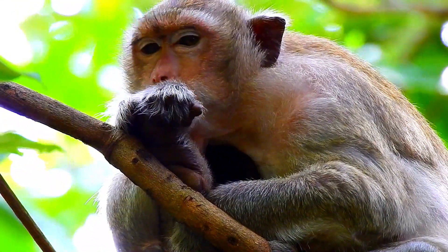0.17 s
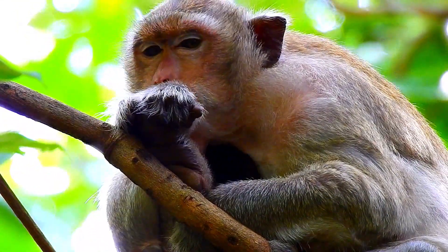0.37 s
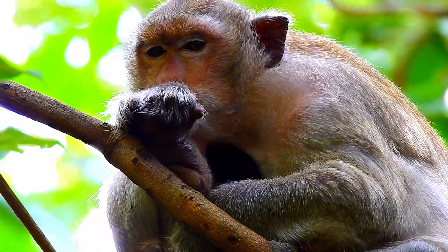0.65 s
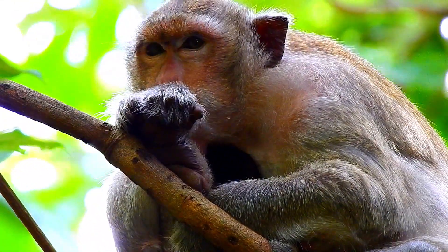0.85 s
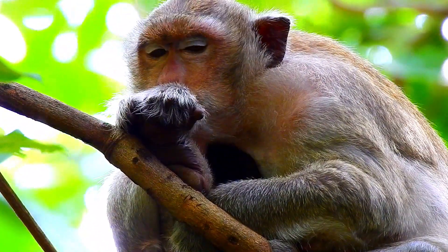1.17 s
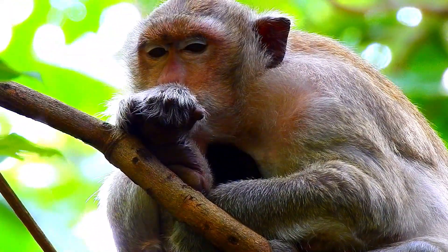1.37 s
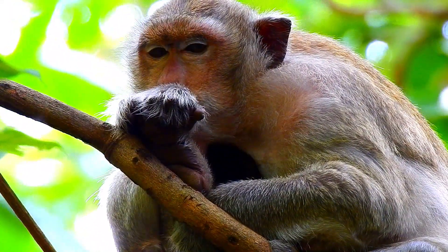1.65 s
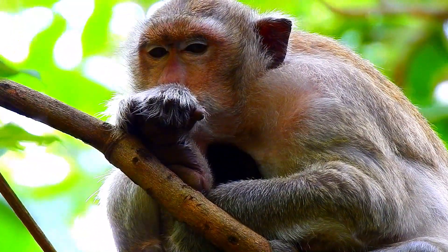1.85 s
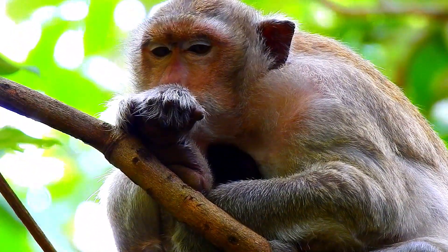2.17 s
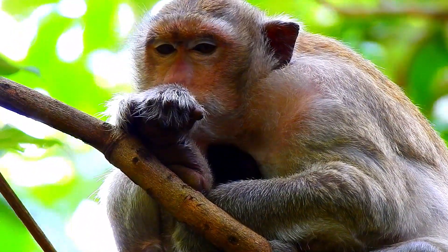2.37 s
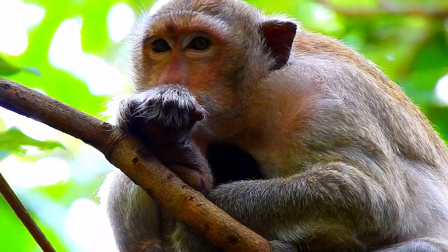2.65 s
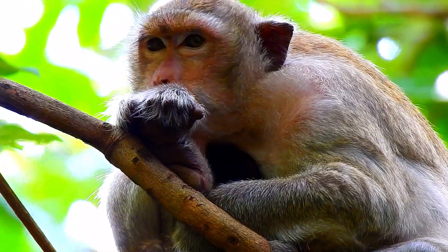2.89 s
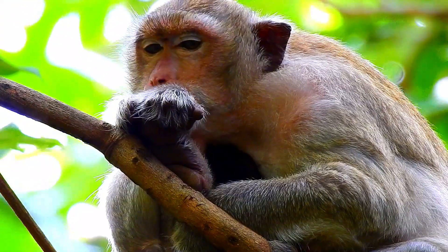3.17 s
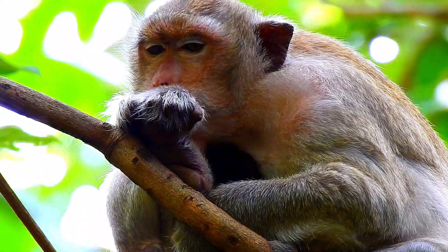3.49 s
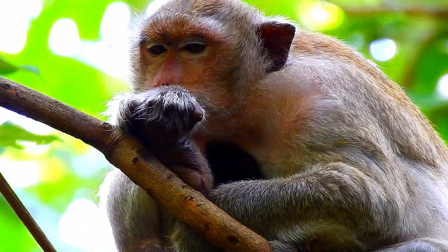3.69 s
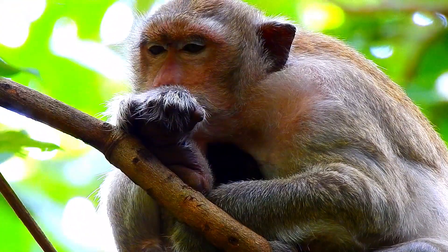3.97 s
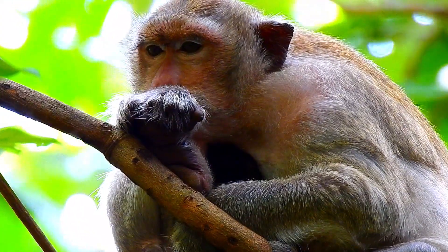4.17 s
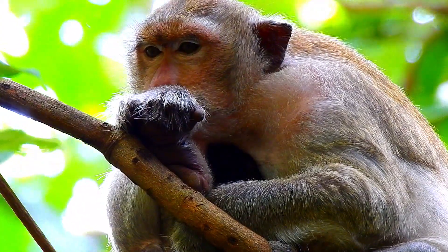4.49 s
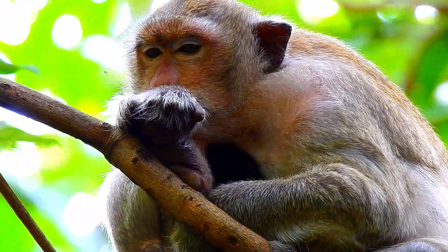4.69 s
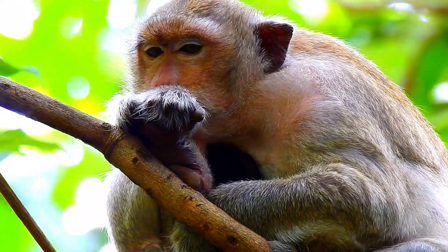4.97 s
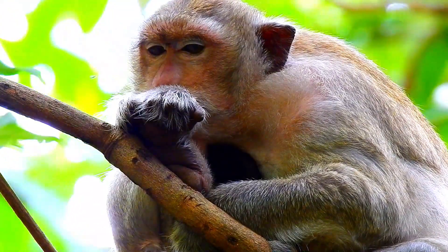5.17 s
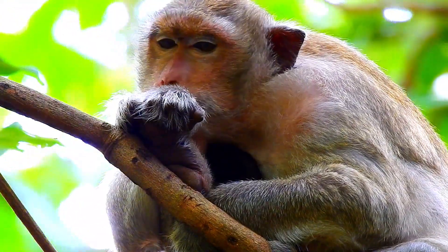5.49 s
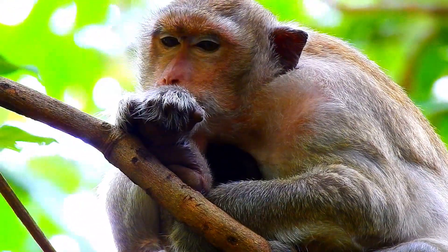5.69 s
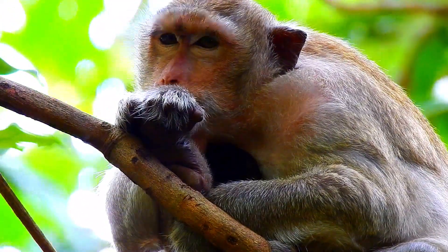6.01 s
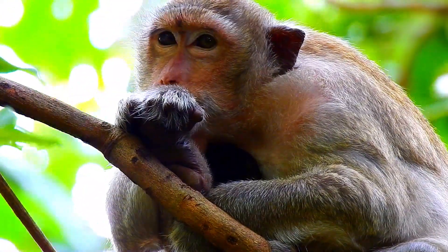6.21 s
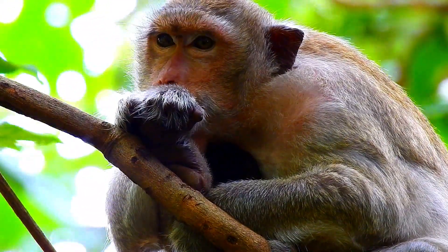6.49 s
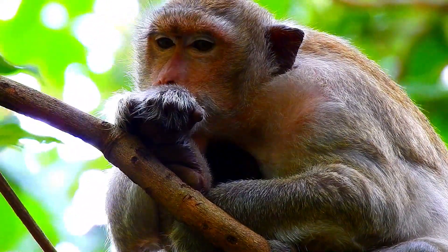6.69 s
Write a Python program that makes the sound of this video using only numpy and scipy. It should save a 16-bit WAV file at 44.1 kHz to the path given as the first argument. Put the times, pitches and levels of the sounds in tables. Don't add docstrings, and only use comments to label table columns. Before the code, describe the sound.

A dense cicada chorus drones at a high, narrow, metallic pitch around 4.5 kHz from the start, slightly fluttering, while one near cicada adds loud single ticks roughly every quarter second. Beneath are low gusty wind rumble with faint moans, a blurred hush of distant calls, hissing leaves and a faint even cricket trill. Quick rasps come at 1.0 and 1.25 seconds, then twig knocks and crackles around 1.3 to 1.5, with faint bird whistles. Near 2.1 a throbbing, split-voiced animal squeal rises and fades amid stronger knocks. Sound cuts dead from 2.5 to 3.0, then returns about 3 dB louder. Brighter bird notes and knocks follow; ticks become less regular. A louder squeal comes at 4.4, buzzing rasps at 4.75 and 5.0, a sharp leaf crackle and clear whistle near 5.4. Crackling continues around 6.1 to 6.5, with light knocks, and the chorus runs to the end at about 7.

```python
import sys
import numpy as np
from scipy import signal
from scipy.fft import rfft, irfft
from scipy.io import wavfile
from scipy.ndimage import uniform_filter1d

SR = 44100
rng = np.random.default_rng(int(sys.argv[2]) if len(sys.argv) > 2 else 0)


def natural_amplitude(level_db):
    exponent = np.asarray(level_db, float) / 20
    return 10 ** exponent


def unload_audio(sound):
    columns = np.transpose(np.atleast_2d(sound))
    steps = np.round(np.clip(columns, -1, 1) * 32767)
    wavfile.write(sys.argv[1], SR, steps.astype(np.int16))


N = 302085

DROPOUT = (2.49408, 2.99457)


def evened(x):
    return x / np.sqrt(np.mean(x ** 2) + 1e-20)


def read(points, hz):
    f, value = np.transpose(points)
    return np.interp(np.log(hz + 1), np.log(f + 1), value)


def add(mix, s, sound, pan_db=0):
    part = mix[:, round(s * SR):][:, :len(sound)]
    sides = natural_amplitude(np.array([[.5], [-.5]]) * pan_db)
    part += sound[:part.shape[1]] * sides


def drift(count, smooth_s):
    size = max(int(smooth_s * SR), 1)
    smooth = uniform_filter1d(rng.standard_normal(count), size)
    return evened(uniform_filter1d(smooth, size))


def resonate(x, hz, width):
    turn = np.exp(2j * np.pi * np.cumsum(hz * np.ones(x.shape[-1])) / SR)
    r = np.exp(-np.pi * width / SR)
    smooth = signal.lfilter([(1 - r) ** 2], [1, -2 * r, r * r], x / turn + 1e-18)
    return 2 * (turn * smooth).real


def ports(a, b):
    # frequency in Hz, left-right likeness (0 to 1).
    likeness = [(50, 0.89), (130, 0.93), (290, 0.56), (640, 0.69), (2000, 1), (4500, 0.65), (7000, 0.094),
                (15000, 0.37)]
    # frequency in Hz, phase by which the left leads in radians.
    left_lead = [(100, 0), (3400, 1.04), (4900, 0.52), (6700, 1.16), (9500, 4), (13000, 2), (15500, 7.5)]
    hz = np.fft.rfftfreq(N, 1 / SR)
    same = np.clip(read(likeness, hz), -1, 1)
    right = same * rfft(a) + np.sqrt(1 - same ** 2) * rfft(b)
    right = right * np.exp(-1j * read(left_lead, hz))
    return np.array([a, irfft(right, N)])


def lift_db():
    return 3 * (np.arange(N) > DROPOUT[0] * SR)


def wind_db():
    # time in seconds, wind strength in dB.
    gusts = [(0, 2), (.3, -2), (1.5, -2), (2.4, 0.5), (3.0, 3), (3.3, -3), (3.6, 1), (4.1, -2), (5.2, -1.5),
             (6.5, 0.5), (6.7, 1), (6.85, -3)]
    return np.interp(np.arange(N) / SR, *np.transpose(gusts))


def swell_db(t, rise_s, rise_db, fall_db_per_s):
    return np.where(t < rise_s, rise_db * (1 - t / rise_s), fall_db_per_s * (rise_s - t))


def wash(colour, patchy_db, bins, frames_long):
    frames, hz = N // 256 + 5, np.fft.rfftfreq(1024, 1 / SR)
    a, b, c, d, patches = rng.standard_normal((frames, 513, 5)).T
    patches = uniform_filter1d(patches, bins, axis=0)
    patches = evened(uniform_filter1d(patches, frames_long, axis=1))
    level_db = read(colour, hz)[:, None] + patchy_db * patches
    z = np.array([a + 1j * b, c + 1j * d]) * natural_amplitude(level_db)
    noise = signal.istft(z, nperseg=1024, noverlap=768)[1][:, :N]
    return evened(ports(*noise))


def whistles(table, blur_hz, clean, fading_db, pan_db):
    mix = np.zeros((2, N))
    for s, length, hz0, hz1, db in table:
        n = int(length * SR)
        hz = np.linspace(hz0, hz1, n)
        fuzz = evened(resonate(rng.standard_normal(n), hz, blur_hz))
        sine = np.sqrt(2) * np.sin(2 * np.pi * np.cumsum(hz) / SR)
        note = clean * sine + (1 - clean) * fuzz
        level_db = db + fading_db * drift(n + SR // 2, .02)[:n]
        add(mix, s, note * natural_amplitude(level_db) * signal.windows.tukey(n, .45), pan_db)
    return mix


def rumble():
    # frequency in Hz, level in dB per Hz.
    colour = [(12, -44.5), (20, -14), (32, -23.5), (62, 0.5), (102, 1.5), (199, -6), (252, -18), (293, -19),
              (330, -28), (430, -63), (730, -120)]
    hz = np.fft.rfftfreq(N, 1 / SR)
    a, b = irfft(rfft(rng.standard_normal((2, N))) * natural_amplitude(read(colour, hz)), N)
    level_db = -46 + 0.41 * lift_db() + wind_db() + 1.3 * drift(N, 0.023)
    return evened(ports(a, b)) * natural_amplitude(level_db)


def moans():
    # start in seconds, length in seconds, start pitch in Hz, end pitch in Hz, level in dB.
    tones = [
        (0, 1.24, 125, 123.1, -48.5),
        (1.62, 0.4, 98, 94.4, -41),
        (2.22, 0.045, 165, 159, -40.5),
        (3.08, 0.087, 169.7, 154, -35.5),
        (3.5, 1.6, 209, 200, -53),
        (5.9, 1.3, 644, 611, -63.5),
        (1.0, 1.08, 802, 823, -62),
        (3.95, 0.36, 471, 467, -63.5),
    ]
    return whistles(tones, blur_hz=24.6, clean=0.25, fading_db=-1.5, pan_db=-2.2)


def hush():
    # frequency in Hz, level in dB per Hz.
    colour = [(140, -35), (230, -11), (280, -5), (679, -8), (816, -9), (915, -13), (2460, -14),
              (2700, -11.5), (3600, -14.5), (4680, -44), (7920, -120)]
    return wash(colour, 4.92, 2, 14) * natural_amplitude(-56.5 + 0.29 * lift_db())


def leaves():
    # frequency in Hz, level in dB per Hz.
    colour = [(3290, -18), (5600, -8), (6190, -7.5), (7990, -20), (8950, -16), (9720, -21), (12700, -23.5),
              (15000, -34.5), (15800, -44)]
    return wash(colour, 2.4, 5, 16) * natural_amplitude(-55.5 + lift_db() + .2 * wind_db())


def birds():
    # start in seconds, length in seconds, start pitch in Hz, end pitch in Hz, level in dB.
    high_notes = [(.86, 0.36, 2690, 2825, -64.5), (1.18, .2, 2420, 2490, -61.5),
                  (1.38, 0.18, 2520, 2560, -57), (1.5, 0.38, 2710, 2846, -60), (1.5, 0.34, 3030, 3240, -60),
                  (1.75, 0.34, 3340, 3264, -62), (2.97, 0.21, 3890, 3765, -50.5),
                  (3.03, .42, 3210, 3016, -55), (3.29, 0.16, 2710, 2686, -48),
                  (3.6, 0.21, 2460, 2445, -62.5), (3.73, 0.18, 3053, 3130, -57.5),
                  (3.84, .1, 3200, 3240, -61), (3.75, .4, 2663, 2820, -60), (4.2, 0.18, 3720, 3650, -56),
                  (4.58, 0.2, 2570, 2366, -65), (5.02, 0.13, 2745, 2390, -58),
                  (5.14, 0.052, 2280, 2280, -52), (5.2, 0.096, 3090, 3065, -51.5),
                  (5.4, .45, 3076, 2960, -64), (5.4, .2, 4150, 4060, -47), (6.66, 0.079, 2436, 2415, -50),
                  (6.58, 0.089, 2450, 2480, -62), (4.78, 0.25, 3303, 3270, -55)]
    # start in seconds, length in seconds, start pitch in Hz, end pitch in Hz, level in dB.
    low_notes = [(.42, 0.5, 832, 810, -65.5), (1.59, 0.039, 1215, 1193, -59), (2.24, .064, 2230, 2220, -61),
                 (2.36, 0.077, 2090, 2080, -61), (3.25, 0.068, 2200, 2244, -58.5),
                 (4.05, 0.1, 1250, 1167, -62), (4.25, 0.27, 1735, 1746, -61.5),
                 (4.56, 0.097, 2100, 2190, -61), (4.87, .2, 1155, 1200, -65), (4.93, .11, 1760, 1750, -62),
                 (5.04, 0.036, 1280, 1330, -65), (5.2, 0.26, 1280, 1313, -61),
                 (5.61, .13, 1143, 1158, -60.5), (5.6, 0.45, 1896, 1850, -65),
                 (6.03, .097, 1242, 1298, -64), (6.58, 0.043, 2170, 2200, -58.5),
                 (6.55, .073, 1203, 1200, -61), (6.785, 0.043, 1610, 1650, -51),
                 (6.82, 0.033, 1995, 2060, -57)]
    high = whistles(high_notes, blur_hz=75, clean=.38, fading_db=2, pan_db=0)
    low = whistles(low_notes, blur_hz=60, clean=.5, fading_db=3.5, pan_db=-2.5)
    return high + natural_amplitude(0.3) * low


def cricket():
    strikes_per_s, centre_hz, width_hz, blur_hz = 99.4, 3996, 310, 23
    hz = np.fft.rfftfreq(N, 1 / SR)
    off_hz = (hz + strikes_per_s / 2) % strikes_per_s - strikes_per_s / 2
    lines = np.exp(-(off_hz / blur_hz) ** 2 / 2)
    comb = lines / (1 + (2 * (hz - centre_hz) / width_hz) ** 2)
    trill = irfft(rfft(rng.standard_normal((2, N))) * comb, N)
    return evened(ports(*trill)) * natural_amplitude(-59 + lift_db())


def crackles():
    # start in seconds, length in seconds, level in dB, centre in Hz, width in Hz.
    crushes = [(1.034, .05, -66, 7500, 5000), (1.187, 0.075, -55, 2330, 3000),
               (2.256, 0.16, -56.5, 2550, 900), (1.467, 0.089, -53, 940, 400),
               (1.483, 0.082, -49, 610, 150), (2.037, 0.017, -52, 6700, 2200),
               (3.523, 0.28, -55.5, 6300, 2500), (3.755, 0.048, -50, 6100, 400),
               (4.554, 0.13, -56.5, 2500, 900), (5.047, 0.071, -51, 6100, 700),
               (5.342, 0.068, -41, 5920, 2770), (5.351, 0.05, -46, 2500, 3560),
               (5.445, 0.036, -43, 5650, 2000), (5.25, .5, -56, 3140, 500),
               (6.078, 0.47, -49.5, 5900, 2330), (6.327, 0.11, -53, 850, 890)]
    mix, size = np.zeros((2, N)), (2, SR // 2 + SR // 10)
    for s, length, db, hz, width in crushes:
        n = int(length * SR)
        snaps = rng.standard_normal(size) * (rng.random(size) < 2500 / SR)
        snaps = snaps[:, :n] + 0.21 * snaps[::-1, :n]
        band = evened(resonate(resonate(snaps, hz, 1.5 * width), hz, 1.5 * width))
        mix[:, round(s * SR):][:, :n] += natural_amplitude(db) * band * signal.windows.tukey(n, .5)
    return mix


def knocks():
    # time in seconds, peak in dB, pitch in Hz, relative treble in dB, ring t60 in seconds.
    twigs = [(1.316, -39.5, 593, -13, 0.069), (1.405, -37.5, 1010, -11, 0.03), (1.475, -40, 930, -15, 0.02),
             (1.5, -42, 586, -23, 0.034), (2.031, -31.5, 950, -14, 0.037), (2.225, -31.5, 940, -6, 0.023),
             (2.325, -29, 870, -15, 0.067), (3.093, -40, 540, -8.5, 0.054), (3.143, -33.5, 960, -11, 0.019),
             (5.375, -41.5, 594, 0, 0.056), (6.387, -38.5, 630, -9, 0.049), (6.439, -43.5, 650, -15, 0.13)]
    mix, t = np.zeros((2, N)), np.arange(4000) / SR
    for s, db, hz, treble_db, t60 in twigs:
        scrape = rng.standard_normal(len(t)) * natural_amplitude(-60 * t / t60) * np.minimum(t / 0.0018, 1)
        wood = resonate(scrape, hz, 217)
        wood = wood + 0.27 * resonate(scrape, 1.4 * hz, 600) + 0.38 * resonate(scrape, .68 * hz, 150)
        tick = resonate(resonate(scrape, 7020, 3000), 7000, 3000)
        knock = wood / abs(wood).max() + natural_amplitude(treble_db - 10.0) * tick / abs(tick).max()
        add(mix, s - .001, natural_amplitude(db) * knock, .2)
    return mix


def buzzes():
    # start in seconds, length in seconds, centre in Hz, top level in dB, fall in dB per second.
    rasps = [
        (1.03, 0.12, 6650, -52.5, 30),
        (1.25, 0.14, 6670, -52.5, 62),
        (2.28, 0.15, 6650, -55, 40),
        (4.742, 0.3, 6680, -47, 21),
        (4.983, 0.32, 6800, -48, 48),
    ]
    mix = np.zeros((2, N))
    for s, length, hz, db, fall_db in rasps:
        t = np.arange(int(length * SR)) / SR
        clicks = (rng.standard_normal(SR) * (rng.random(SR) < 3000 / SR))[:len(t)]
        level_db = db + swell_db(t, 0.62 * length, -4, fall_db) + 0.5 * drift(SR, 0.009)[:len(t)]
        rasp = evened(resonate(clicks, hz, 420))
        add(mix, s, rasp * natural_amplitude(level_db) * signal.windows.tukey(len(t), .15), .4)
    return mix


def squeals():
    # start in seconds, length in seconds, pitch of the second partial in Hz, top level in dB,
    # distance of the upper voice above it in Hz.
    cries = [
        (2.088, 0.383, 3292, -40, 62),
        (4.386, 0.39, 3277, -38.5, 113),
    ]
    rise_s, throbs_per_s, throb_db, sag_hz_per_s = 0.094, 14, 1.5, 30
    mix = np.zeros((2, N))
    for s, length, hz, db, apart_hz in cries:
        t, voice = np.arange(int(length * SR)) / SR, 0
        for pitch_hz, share_db in (hz, 0), (hz + apart_hz, 2 - 19 * t):
            wobble = 1 + .009 * drift(SR, 0.0082)[:len(t)]
            turn = np.pi * np.cumsum((pitch_hz - sag_hz_per_s * t) * wobble) / SR
            first = natural_amplitude(-14 - 15.5 * t) * np.cos(turn)
            partials = first + np.cos(2 * turn) + natural_amplitude(-21.5) * np.cos(4 * turn)
            shaky_db = 2.5 * drift(SR, 0.022)[:len(t)]
            voice = voice + natural_amplitude(share_db + shaky_db) * partials
        effort_db = np.maximum(swell_db(t, rise_s, -11.5, 68.5), -15)
        effort_db = effort_db + throb_db * (np.cos(2 * np.pi * throbs_per_s * (t - rise_s)) - 1)
        add(mix, s, voice * natural_amplitude(db + effort_db + 2) * signal.windows.tukey(len(t), .1), .3)
    return mix


def forest(x):
    # frequency in Hz, t60 in seconds.
    trunk_decay = [(500, .35), (3000, .33), (8000, .2)]
    taps = np.zeros((2, SR // 2))
    at = np.arange(400, SR // 2 - 20, 20)
    at = at + rng.integers(0, 20, (2, len(at)))
    np.put_along_axis(taps, at, rng.choice([-1., 1.], at.shape), 1)
    hz, t, z = signal.stft(taps, SR, nperseg=256)
    decay = natural_amplitude(-60 * t / read(trunk_decay, hz)[:, None])
    tail = signal.istft(z * decay, SR, nperseg=256)[1]
    tail = tail / np.linalg.norm(tail[0])
    return signal.fftconvolve(x.mean(0)[None], tail, axes=1)[:, :N]


def cicada_ticks():
    # time in seconds, peak in dB, pitch in Hz, left over right in dB.
    ticks = [(0.223, -25.5, 4480, -0.5), (0.4951, -27, 4600, 0.0), (0.7438, -27, 4600, 3),
             (1.0335, -28.5, 4520, 3), (1.319, -28.5, 4400, 1.0), (1.596, -25, 4590, 1.0),
             (1.8613, -23, 4600, 1.0), (2.0532, -32, 4590, 12), (2.1284, -28.5, 4520, 0.5),
             (2.2768, -28.5, 4550, 2.5), (2.4466, -31.5, 4470, 0.5), (3.0791, -27.5, 4530, 1.0),
             (3.3845, -28, 4720, 9), (3.686, -28, 4670, 0.5), (4.2614, -28.5, 4560, 1.0),
             (4.68, -31, 4510, 6), (4.8927, -30, 4680, 12), (5.138, -25.5, 4400, 5),
             (5.6185, -30, 4760, 1.5), (5.8353, -28.5, 4700, 5), (6.099, -28.5, 4830, 0.5)]
    mix, t = np.zeros((2, N)), np.arange(1500) / SR
    for s, db, hz, pan_db in ticks:
        burst = rng.standard_normal(len(t)) * natural_amplitude(-60 * t / 0.069) * np.minimum(t / 0.0027, 1)
        tick = resonate(resonate(burst, hz, 570), hz, 570)
        add(mix, s - .001, natural_amplitude(db - 1) * tick / abs(tick).max(), pan_db)
    return mix


def cicadas():
    # body resonance in Hz, width in Hz, level in dB.
    tymbal = [(4510, 420, 7), (4760, 620, 7.5), (5870, 1100, -30), (4277, 570, -4.5)]
    strength = natural_amplitude(1.3 * np.minimum(rng.exponential(1, (2, N)), 5))
    clicks = (rng.random((2, N)) < 4000 / SR) * strength
    clicks = clicks * rng.choice([-1., 1.], (2, N))
    body = sum(natural_amplitude(db) * resonate(clicks, hz, width) for hz, width, db in tymbal)
    body = signal.sosfilt(signal.cheby2(12, 40, 3820, "high", fs=SR, output="sos"), body)
    level_db = -40 + lift_db() + 1.05 * drift(N, 0.022) + 0.64 * drift(N, 0.12)
    return evened(ports(*body)) * natural_amplitude(level_db) + cicada_ticks()


def scene():
    low = rumble() + moans()
    far = natural_amplitude(2.2) * birds() + squeals() + buzzes()
    wood = knocks() + crackles()
    echoes = forest(natural_amplitude(-5) * far + natural_amplitude(-13) * wood)
    echoes = echoes + 0.16 * echoes[::-1]
    return low + hush() + leaves() + cricket() + natural_amplitude(-2.0) * far + wood + echoes + cicadas()


def band_limit(x):
    return signal.sosfilt(signal.butter(12, 16460, fs=SR, output="sos"), x)


def record(dry):
    t = np.arange(N) / SR
    low_pass = signal.firwin(511, 15720, window=("kaiser", 9), fs=SR)
    dull = signal.oaconvolve(dry, low_pass[None], "same")
    live = np.where((t < DROPOUT[0]) | (t > DROPOUT[1]), 1, natural_amplitude(-75))
    return band_limit(dull * live)


dry = scene()
out = record(dry)
unload_audio(out)
```